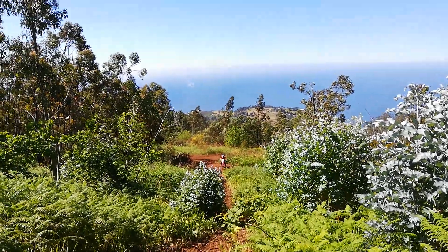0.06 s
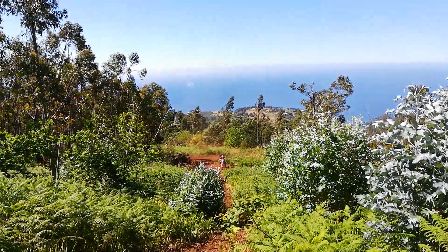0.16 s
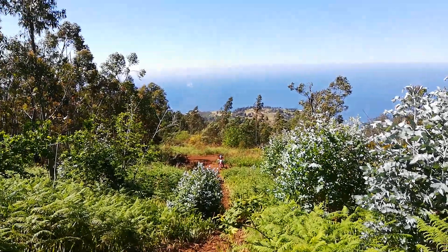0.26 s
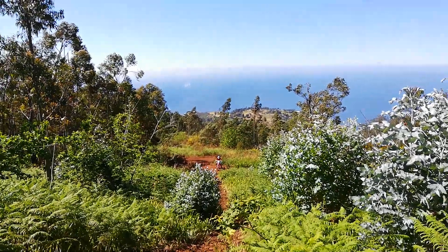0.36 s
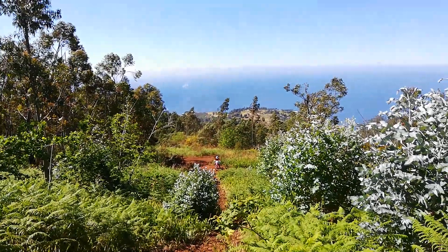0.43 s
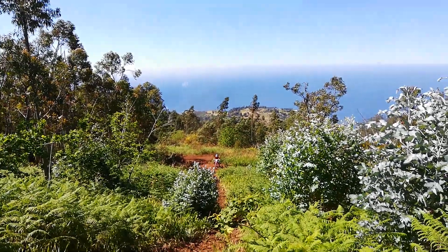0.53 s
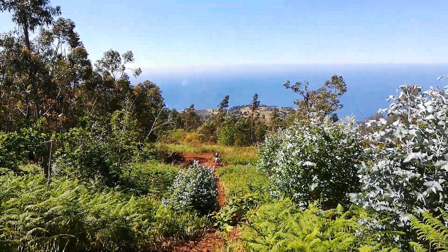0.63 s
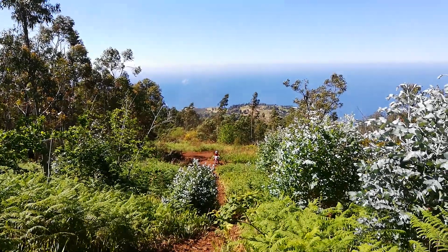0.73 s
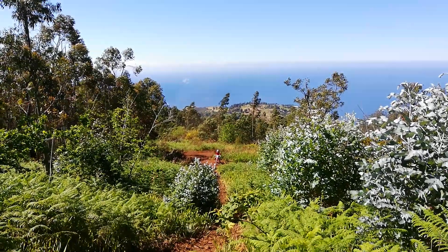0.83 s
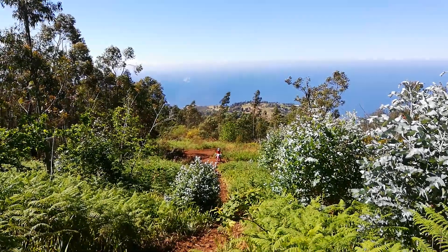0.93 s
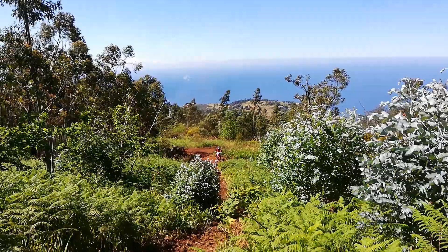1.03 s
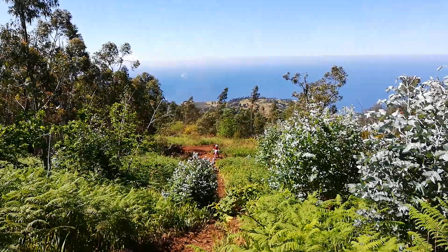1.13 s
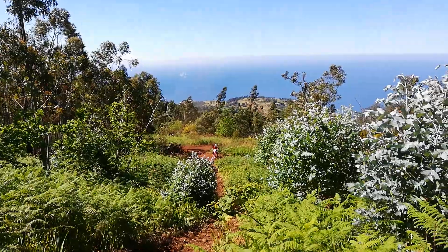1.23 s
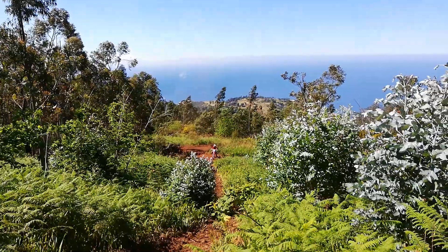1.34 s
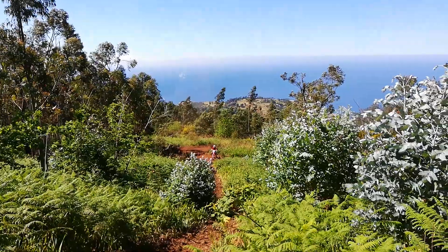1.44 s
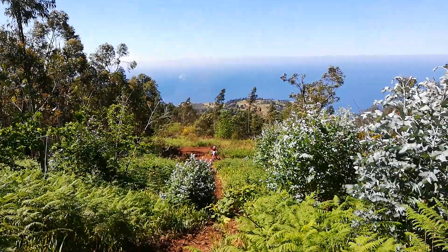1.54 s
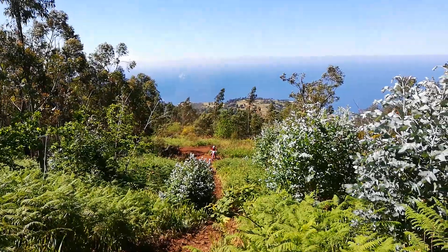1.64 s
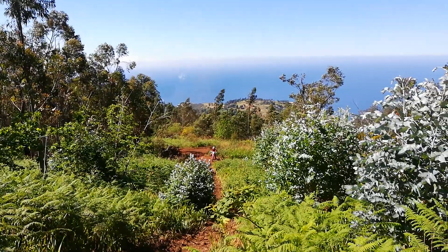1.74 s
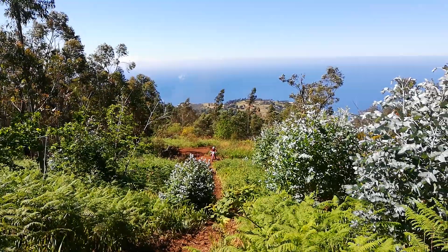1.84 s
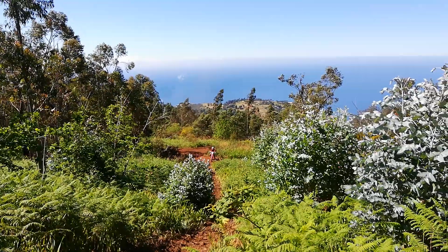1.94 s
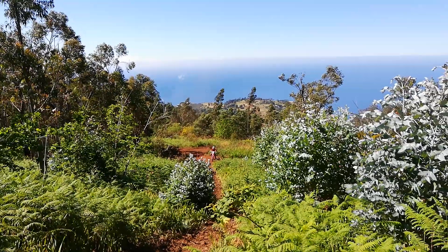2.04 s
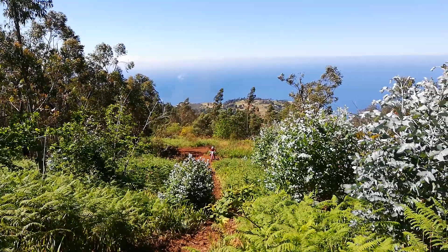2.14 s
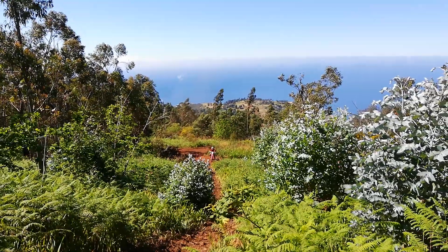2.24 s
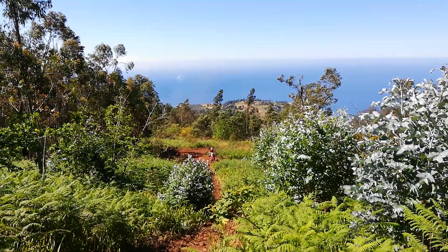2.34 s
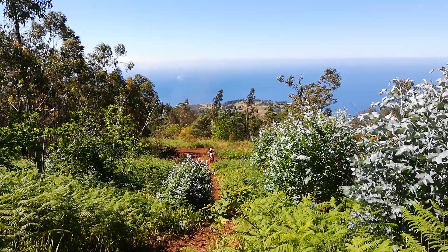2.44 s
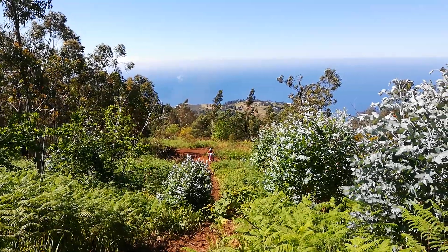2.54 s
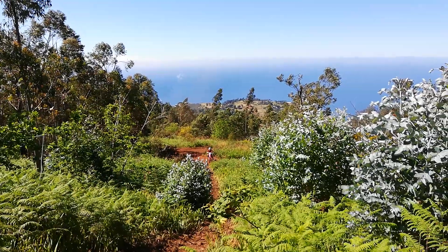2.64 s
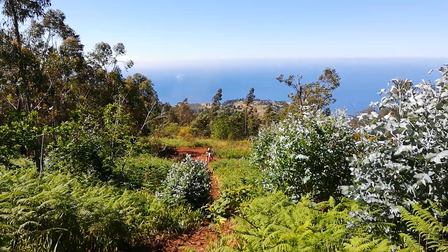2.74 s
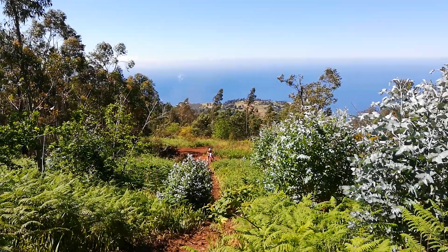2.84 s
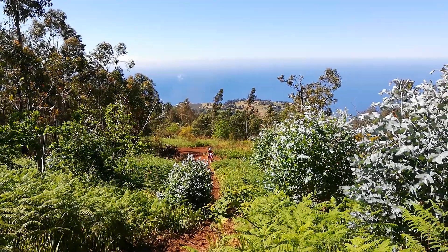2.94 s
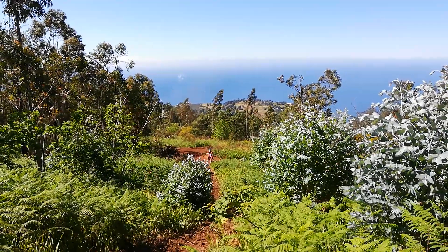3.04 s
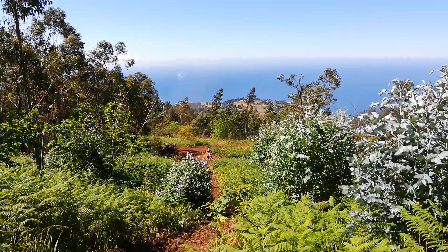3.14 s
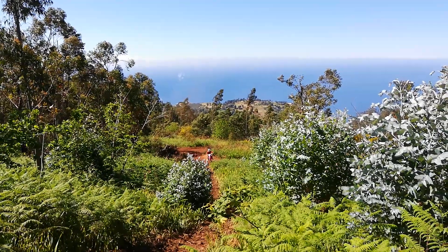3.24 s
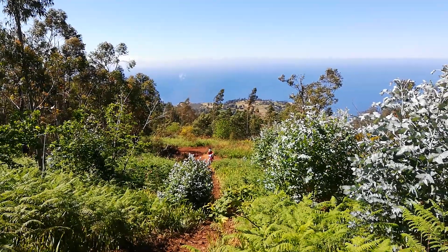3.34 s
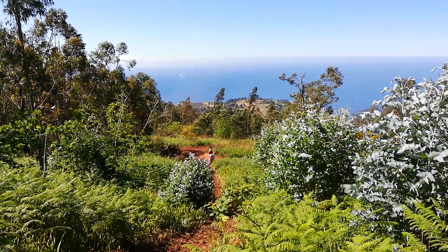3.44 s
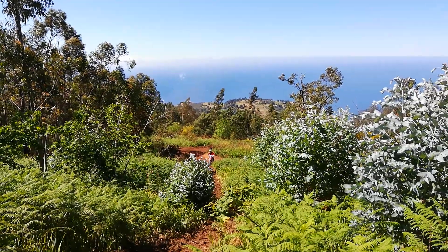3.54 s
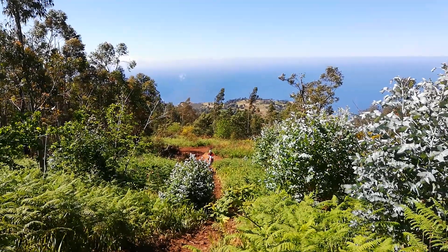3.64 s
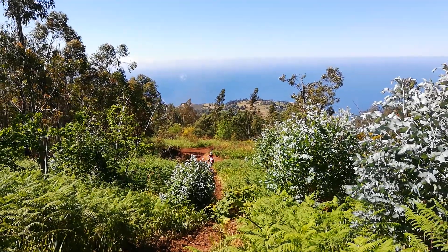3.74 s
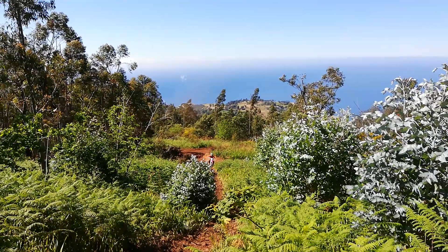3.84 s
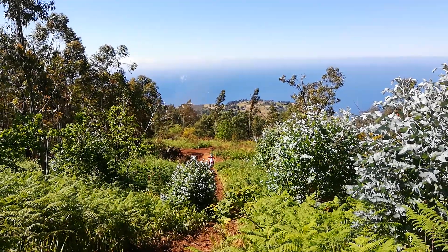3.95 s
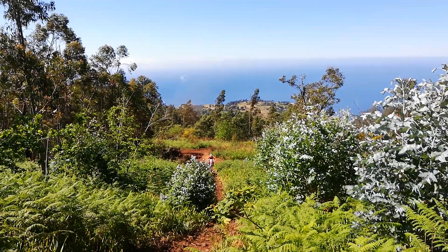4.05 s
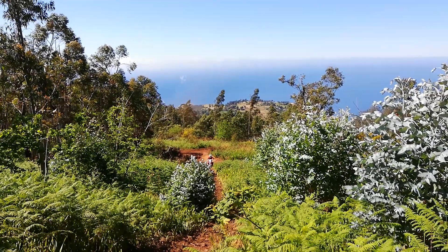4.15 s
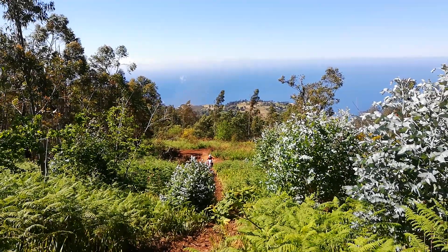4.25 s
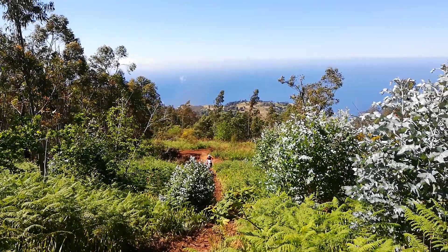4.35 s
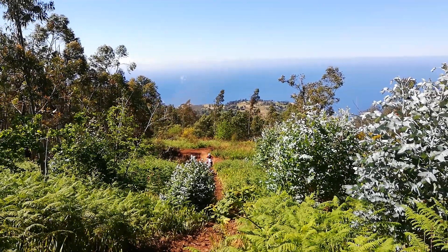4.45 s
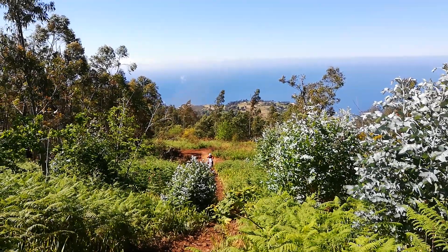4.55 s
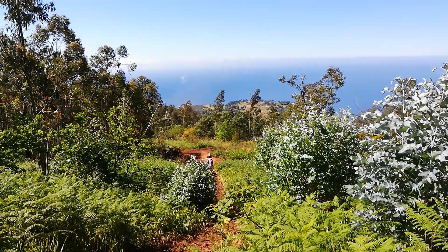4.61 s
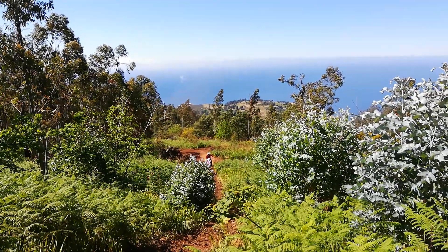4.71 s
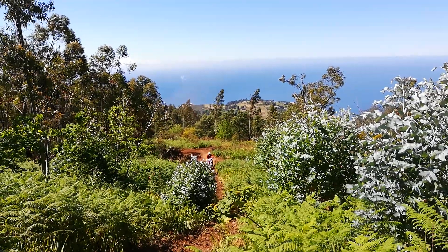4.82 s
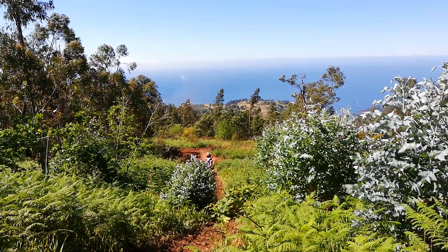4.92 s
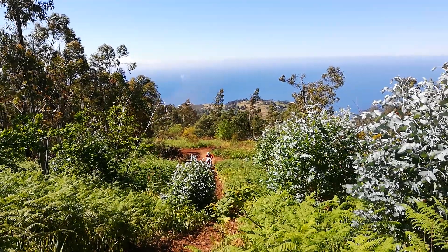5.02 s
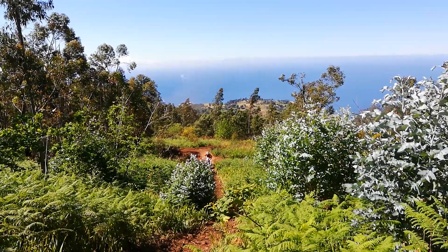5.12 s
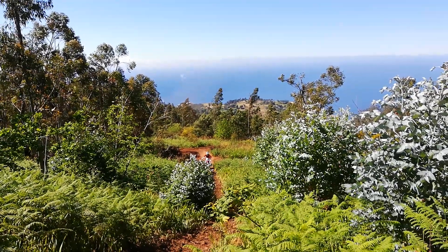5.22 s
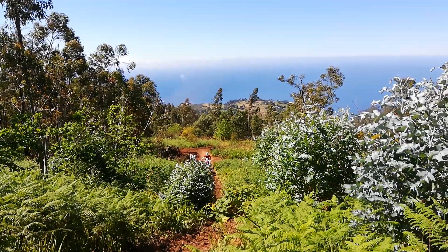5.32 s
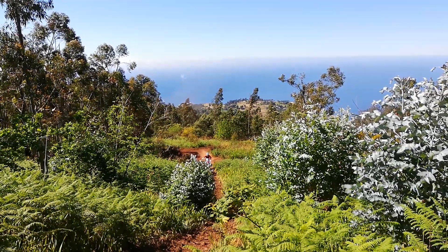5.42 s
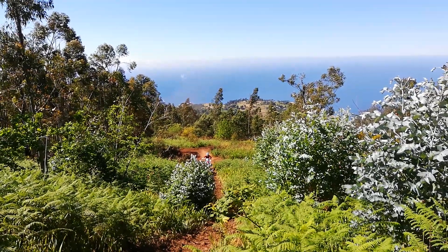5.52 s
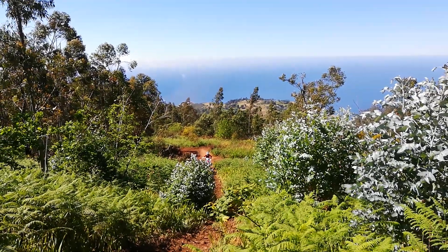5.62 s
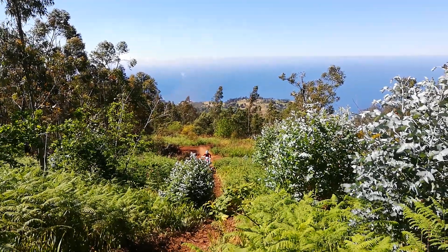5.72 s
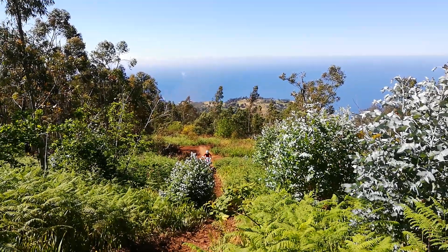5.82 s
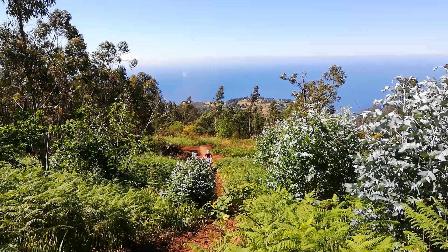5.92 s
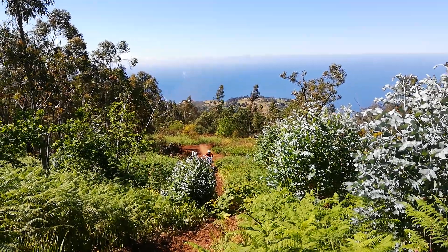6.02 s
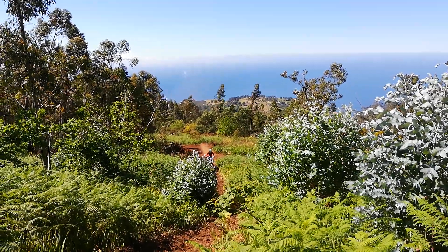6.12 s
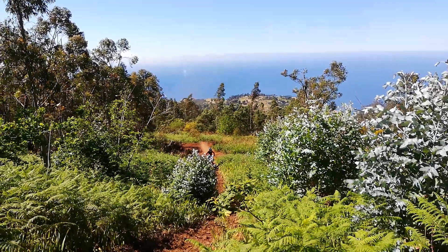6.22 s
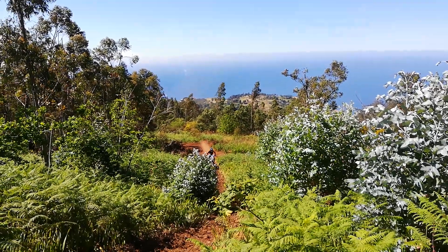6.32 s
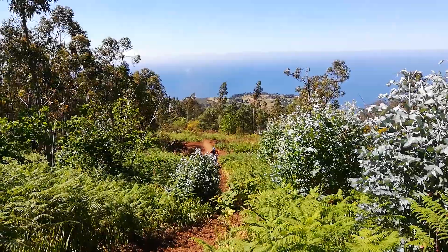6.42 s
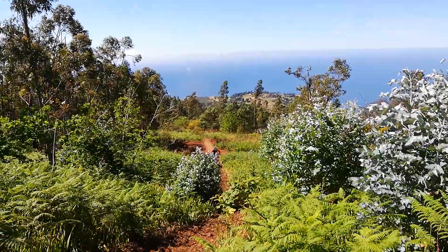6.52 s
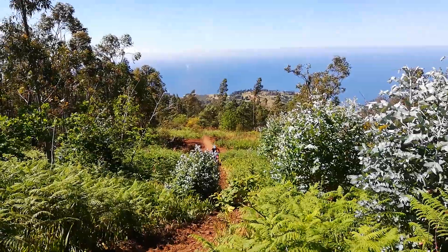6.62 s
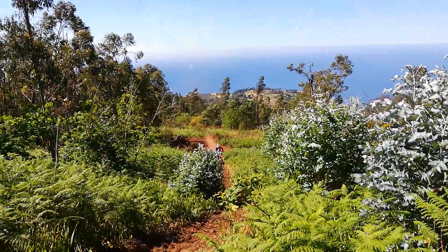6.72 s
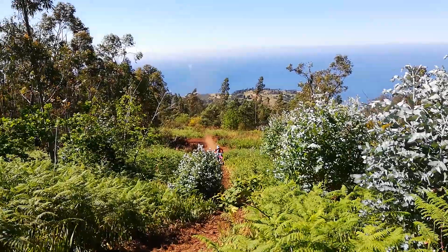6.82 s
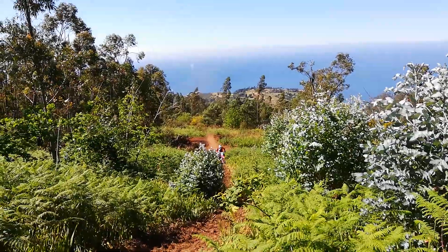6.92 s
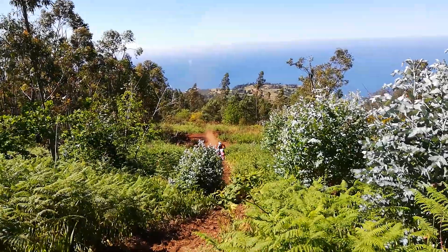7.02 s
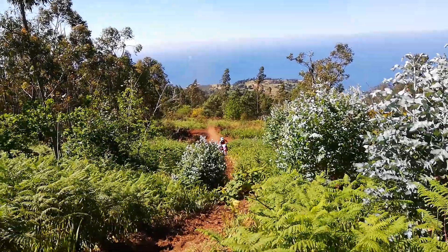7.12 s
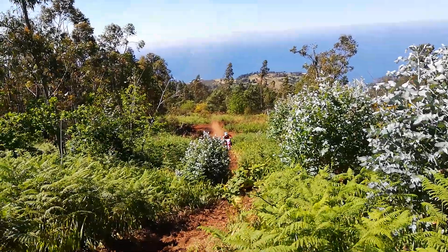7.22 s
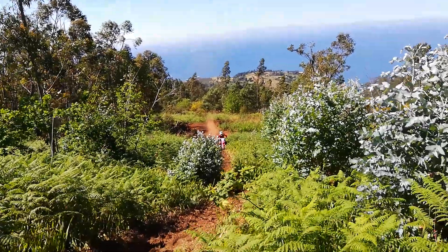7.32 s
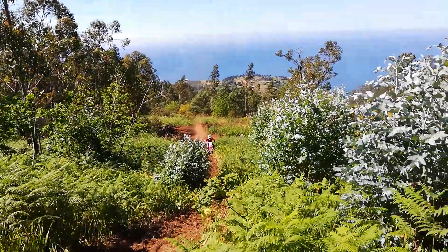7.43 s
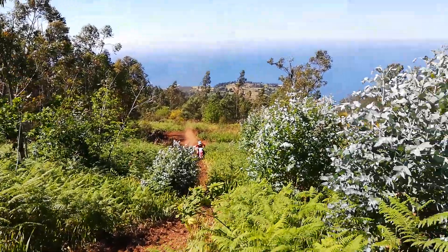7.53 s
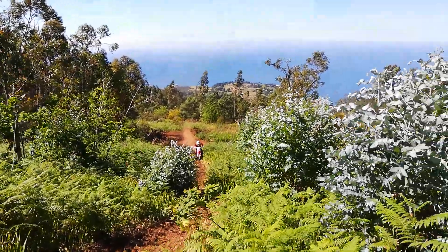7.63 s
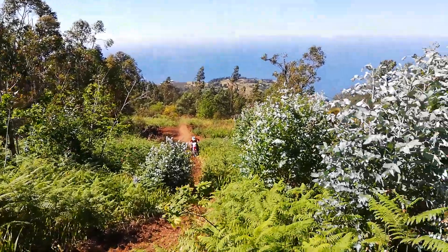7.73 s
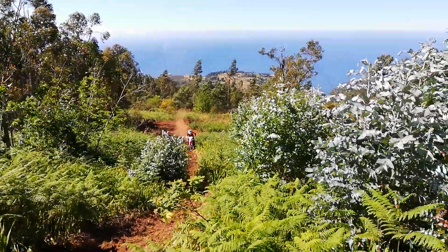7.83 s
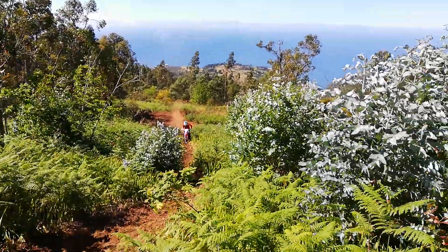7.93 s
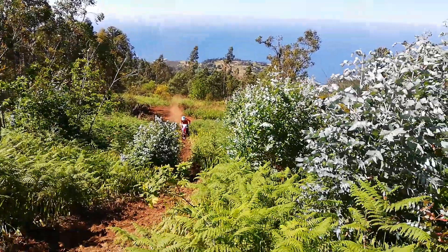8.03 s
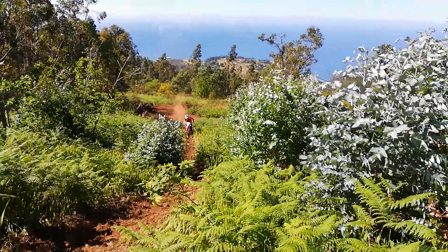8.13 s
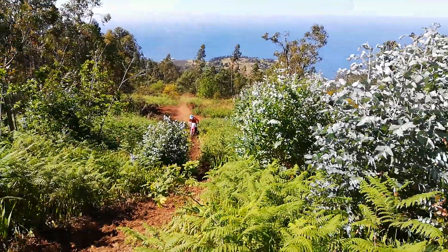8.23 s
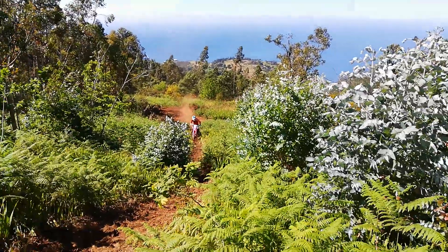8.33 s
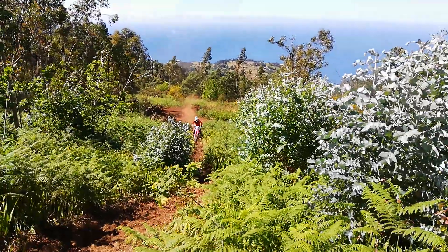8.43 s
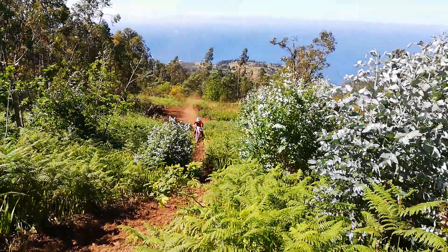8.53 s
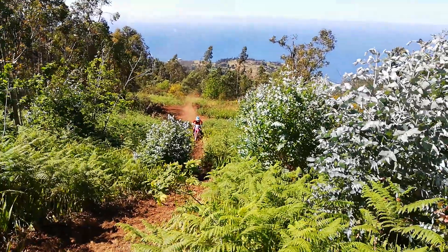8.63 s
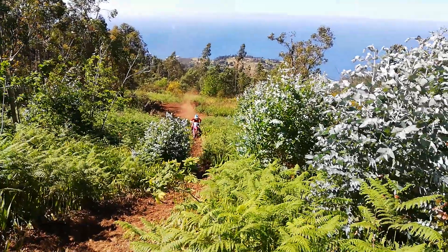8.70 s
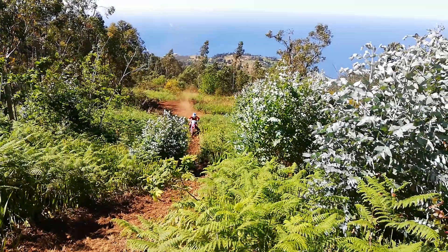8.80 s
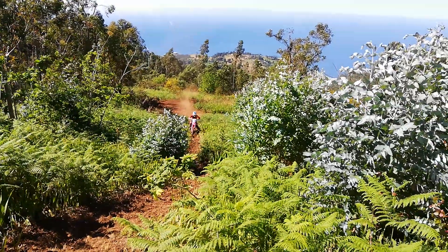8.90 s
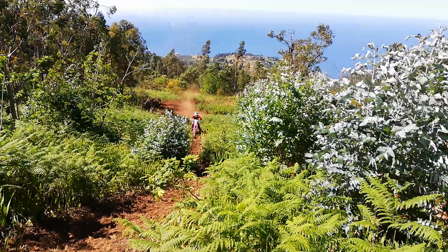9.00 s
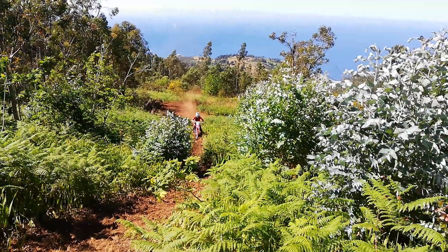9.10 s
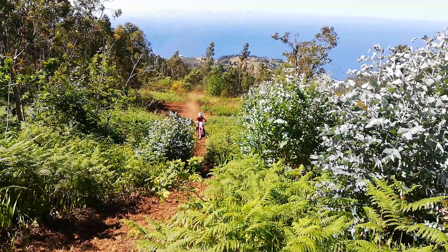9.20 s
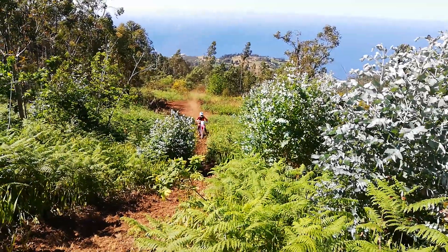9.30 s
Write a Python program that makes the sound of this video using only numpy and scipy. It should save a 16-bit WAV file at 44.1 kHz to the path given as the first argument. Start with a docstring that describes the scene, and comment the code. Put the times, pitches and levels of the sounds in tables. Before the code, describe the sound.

Outdoors on a quiet hillside, a single-cylinder four-stroke dirt bike putters faintly at first, then revs up and down in short throttle blips as it climbs closer. The exhaust turns from soft thumping to a hard, raspy bark. Late on, dry fronds rustle and twigs snap sharply right beside the stereo phone microphone, and the engine ends high and loud.

```python
"""A single-cylinder four-stroke dirt bike climbs a dirt trail toward a phone, the throttle blipped again and again.
Each firing thumps through the silencer as a stack of engine orders (multiples of the firing rate).
With the throttle open, filtered puffs of noise make the gas bark and hiss, with a crack and a rattle in each cycle.
Close by, dry undergrowth rustles and snaps as noise grains and tiny bursts.
Behind it lie a faint hillside hiss, a thin whine, both of filtered noise, a gliding bird note and two dull knocks."""
import sys
import numpy as np
from scipy import signal
from scipy.fft import rfft, irfft
from scipy.io import wavfile
from scipy.ndimage import uniform_filter1d

SR = 44100
rng = np.random.default_rng(int(sys.argv[2]) if len(sys.argv) > 2 else 0)


def dump(signal):
    """Clip the signal to [-1, 1] and save it as 16-bit WAV at the path in sys.argv[1]."""
    limited = np.clip(np.atleast_2d(signal).T, -1, 1)
    pcm = np.round(limited * 32767).astype(np.int16)
    wavfile.write(sys.argv[1], SR, pcm)


N = 412776

# tone of the barking exhaust gas: (frequency [Hz], relative level [dB])
BARK_TONE = [(260, -30), (440, -9.5), (581, -4), (712, -6.5), (947, -1), (1160, 0.5), (1390, -0.5),
             (1530, -6), (1690, -13.5), (2000, -7.5), (2600, -47.5), (4400, -120)]


def undb(db):
    """Turns decibels into a plain gain."""
    return 10 ** (np.asarray(db) / 20)


def unit(x):
    """Scales a sound to an overall RMS of 1."""
    return x / np.sqrt(np.mean(x ** 2))


def along(table, hz):
    """Reads (frequency [Hz], value) rows on a log-frequency axis."""
    f, v = np.transpose(table)
    return np.interp(np.log(hz + 1), np.log(f + 1), v)


def curves(table):
    """Draws straight lines through timed rows, one curve for each column after the time."""
    s, *columns = np.transpose(table)
    return [np.interp(np.arange(N) / SR, s, c) for c in columns]


def colour(x, spectrum):
    """Filters with the gain of (frequency [Hz], level [dB]) rows, never answering before the input."""
    log_gain = np.log(undb(along(spectrum, np.linspace(0, SR / 2, 2049))))
    # folding the cepstrum gives the minimum-phase filter of this gain
    cepstrum = irfft(log_gain)
    cepstrum[1:2048] *= 2
    cepstrum[2049:] = 0
    response = irfft(np.exp(rfft(cepstrum)))
    return signal.oaconvolve(np.atleast_2d(x), response[None], axes=1)[:, :N]


def walk(rate):
    """Wanders smoothly: random levels held for 1 / rate seconds, then averaged twice; spread about 0.4."""
    hold = int(SR / rate)
    steps = np.repeat(rng.standard_normal(N // hold + 1), hold)
    return 0.56 * uniform_filter1d(uniform_filter1d(steps, hold), hold)[:N]


def ports(mid, side):
    """Feeds two microphone ports by mixing a shared and an unrelated part, frequency by frequency."""
    # how alike left and right are: (frequency [Hz], correlation [-1 to 1])
    likeness = [(60, 0.9), (130, 0.9), (290, 0.85), (640, 0.8), (1410, 0.85), (3100, 0.6), (6820, 0.3),
                (15000, 0.2)]
    # balance: (frequency [Hz], left minus right [dB])
    left_db = [(60, 0.0), (110, 0.0), (200, 0.0), (380, -3.5), (700, -3.5), (1290, -3.0), (2380, -1.5),
               (4400, -2.0), (8120, 0.5), (15000, 0.0)]
    # phase by which left leads right: (frequency [Hz], lead [rad])
    lead = [(300, 0.66), (1200, 0.29), (2200, 0.057), (4900, 0.81), (6600, 1), (9200, 0.99), (14000, 0.41)]
    hz = np.linspace(0, SR / 2, N // 2 + 1)
    alike = np.clip(along(likeness, hz), 0, 1)
    # half of the balance and lead goes to each port, in opposite directions
    lean = undb(along(left_db, hz) / 2) * np.exp(.5j * along(lead, hz))
    shared = rfft(mid) * np.sqrt((1 + alike) / 2)
    unrelated = rfft(side) * np.sqrt((1 - alike) / 2)
    return irfft(np.array([(shared + unrelated) * lean, (shared - unrelated) / lean]), N)


def hill():
    """Leaves and air far off hiss faintly: filtered noise, partly alike at the two ports."""
    # tone of the hiss: (frequency [Hz], relative level [dB])
    air_tone = [(120, 12), (200, 1.5), (300, 0.5), (403, -7), (727, -10.5), (923, 3), (1310, -18),
                (1580, -10), (1790, -5.5), (2740, -16.5), (6160, -21.5), (9590, -17), (15200, -38.5),
                (16400, -32)]
    # part that is alike at both ports: (frequency [Hz], share of the power [0-1])
    shared_part = [(300, 0.72), (1200, 0.097), (4000, 0.15)]
    level_db = -48  # typical level; it wanders slowly around this
    both, left, right = (rfft(x) for x in colour(rng.standard_normal((3, N)), air_tone))
    share = np.clip(along(shared_part, np.linspace(0, SR / 2, len(both))), 0, 1)
    air = irfft(np.sqrt(share) * both + np.sqrt(1 - share) * np.array([left, right]), N)
    return unit(air) * undb(level_db + 1.2 * walk(3))


def whine():
    """A narrow band of noise near five kilohertz sings thinly and flickers."""
    # strength before the flicker: (time [s], level [dB])
    strength = [(0, -90), (1.7, -80), (2.2, -66.5), (3.0, -74), (3.5, -77), (4.1, -65), (4.7, -69),
                (5.0, -75), (6.5, -72), (9.36, -74)]
    centre_hz, width_hz = 4970, 120
    level_db, = curves(strength)
    b, a = signal.iirpeak(centre_hz, centre_hz / width_hz, SR)
    band = unit(signal.lfilter(b, a, rng.standard_normal((2, N))))
    return ports(*band) * undb(level_db + 7.0 * walk(14))


def bird_note():
    """A far bird gives one short falling note: a gliding sine that swells and fades."""
    start_s, length_s, glide_hz, peak_db = .912, 0.019, (3600, 2820), -55
    progress = np.clip((np.arange(N) / SR - start_s) / length_s, 0, 1)
    phase = 2 * np.pi * np.cumsum(np.interp(progress, [0, 1], glide_hz)) / SR
    return undb(peak_db) * np.sin(np.pi * progress) * np.sin(phase)


def knocks():
    """Each dull knock is a fading burst of noise through a broad resonance."""
    # the knocks: (time [s], centre frequency [Hz], peak level [dB])
    strikes = [(0.141, 650, -40), (8.75, 350, -23)]
    t60_s = .05  # time for the burst to fade by 60 dB
    t = np.arange(N) / SR
    out = np.zeros(N)
    for s, hz, db in strikes:
        fade = (t > s) * undb(-60 * np.abs(t - s) / t60_s)
        knock = signal.lfilter(*signal.iirpeak(hz, 1.2, SR), fade * rng.standard_normal(N))
        out = out + undb(db) * knock / np.abs(knock).max()
    return out


def brush():
    """Dry fronds rub: flickering noise with a spray of tiny cracks of differing strength at the two ports."""
    # strength of the rustle: (time [s], level [dB])
    strength = [(6.55, -75), (6.71, -64), (6.91, -41), (7.09, -44.5), (7.32, -29.5), (7.56, -40),
                (7.64, -30.5), (8.1, -38), (8.32, -44.5), (8.56, -42), (8.79, -38.5), (8.87, -52),
                (9.1, -74)]
    # tone of the rustle: (frequency [Hz], relative level [dB])
    frond_tone = [(1060, -50), (1800, -32), (2350, -54), (2940, -13.5), (6090, -8.5), (8420, -2),
                  (9580, 3.5), (12900, -10.5), (15100, -10), (15900, -40), (16400, -66)]
    cracks_per_s, crack_decay_s = 550, 0.00046
    rustle_db, = curves(strength)
    s = np.arange(N) / SR
    moving = np.clip(np.minimum(s - strength[0][0], strength[-1][0] - s) / .1, 0, 1)
    hit = rng.random(N) < cracks_per_s / SR
    # both ports crack at the same moments, but each with some strength of its own
    size_db = 3.7 * rng.exponential(size=N).clip(0, 2.8) + 3.1 * rng.standard_normal((2, N))
    cracks = signal.lfilter([1], [1, -np.exp(-1 / (crack_decay_s * SR))], hit * undb(size_db))
    grain = (undb(0.7 * walk(40)) + cracks) * rng.standard_normal((2, N))
    return unit(colour(grain, frond_tone)) * undb(rustle_db) * moving


def snaps():
    """A twig breaks with a noise burst well under a millisecond long, then a short rattle, in two bands."""
    # twigs: (time [s], main band peak [dB], main band centre [Hz],
    # second band against the main one [dB], left minus right [dB])
    twigs = [(2.0786, -16.5, 8460, -37, -5), (2.195, -36, 9270, -11, -4), (6.9208, -16, 8600, -34, -9),
             (7.2296, -25, 9500, -24, -2), (7.288, -22, 9630, -23, -5), (7.43, -27, 10260, -20, 1.5),
             (7.457, -8.5, 10100, -27, -4), (7.498, -30, 8830, -20, -1), (7.6153, -17, 9820, -25, 1.0),
             (7.6294, -4.5, 9500, -30, -3), (7.7135, -8.5, 9500, -15, 2), (7.7506, -26, 8850, 4.5, -6),
             (7.781, -11, 7850, -10, 1), (7.8085, -11, 9200, -16, -1), (7.8192, -6.5, 8700, -7.5, -7),
             (7.8485, -11, 8500, -27, 3), (7.875, -11, 9400, -4.5, -5), (7.902, -18, 8560, -26, 2),
             (7.9423, -14, 8400, -25, 0.5), (8.0089, -15, 9600, -20, 0.5), (8.0975, -9, 7850, -28, -2),
             (8.139, -12, 9000, -7, -3), (8.1556, -14, 8660, -3.5, 4), (8.1978, -16.5, 8160, -26, -3),
             (8.274, -13, 7000, -26, 5), (8.3211, -23, 10600, -20, 1.5), (8.34, -6, 12400, -42, -3),
             (8.39, -10, 9200, -42, 0), (8.448, -14, 9000, -32, 1), (8.471, -19, 8700, -6, -3),
             (8.4947, -7, 9100, -34, -5), (8.516, -20, 8640, -5, -1.0), (8.538, -7, 9500, -35, -4),
             (8.5829, -31, 8870, -8, 0.0), (8.6278, -30, 10300, 7, -1.0), (8.6644, -9.5, 10300, -4, 4),
             (8.7058, -14, 8500, -15, -6), (8.7549, -8.5, 8750, -6.5, 0), (8.798, -8, 9450, -29, -3),
             (8.9695, -26, 9700, 5, -5)]
    length = 900  # samples
    out, t = np.zeros((2, N + length)), np.arange(length) / SR
    noise = rng.standard_normal((len(twigs), 3, length))
    envelope = t / 0.00012 * np.exp(-t / 0.000083) + 0.048 * np.exp(-t / 0.0036)
    for (s, db, hz, second_db, pan_db), (both, left, right) in zip(twigs, noise):
        burst = (both + .9 * np.array([left, right])) * envelope
        snap = 0
        for centre_hz, q, part_db in [(hz, 2.1, 0), (4000., 1.1, second_db)]:
            b, a = signal.iirpeak(centre_hz, q, SR)
            part = signal.lfilter(b, a, signal.lfilter(b, a, burst))
            snap = snap + undb(part_db) * part / np.abs(part).max()
        at = int(s * SR)
        out[:, at:at + length] += snap * undb(db + np.array([[pan_db], [-pan_db]]) / 2)
    return out[:, :N]


def crank(hz):
    """Counts cycles from the firing rate, gaining or losing a little so that a firing falls on every chug."""
    # firings that stand out singly: (time [s])
    chugs = [.219, 3.878, 5.07, 5.171, 5.203, 5.394, 5.449, 5.766, 5.92, 5.971, 6.012, 6.109, 6.138, 6.189,
             7.912, 7.968, 8.036, 8.087, 8.616, 9.004, 9.084, 9.159, 9.266]
    cycle, gained = np.cumsum(hz) / SR, [0]
    at = (np.array(chugs) * SR).astype(int)
    for c in cycle[at]:
        gained.append(np.round(c + gained[-1]) - c)
    return 1 + cycle + np.interp(np.arange(N), at, gained[1:])


def throttle_shut():
    """Tells how far the throttle is shut, 0-1, while the engine idles or brakes."""
    # closed spells: (start [s], length [s], share shut [0-1])
    lifts = [(-.1, 1.98, 0.89), (3.6, 0.087, 0.8), (4.99, 0.19, 0.7), (5.687, 0.34, 0.56),
             (6.393, 0.086, 0.48), (7.376, 0.63, 0.77), (8.203, 0.17, 0.36), (8.933, 0.29, 0.06)]
    edge_s = 0.015  # time to close or open
    t = np.arange(N) / SR
    shut = 0
    for start, length, share in lifts:
        shut = shut + share * np.clip(np.minimum(t - start, start + length - t) / edge_s, 0, 1)
    return np.clip(shut, 0, 1)


def orders(hz, cycle, chance, thump_db, shut, growl_db):
    """Sums cosines at multiples of the firing rate: the thump of the pipe and the growl of the engine cases."""
    # balance of the orders at the tailpipe: (frequency [Hz], relative level [dB])
    silencer = [(18, -12), (30, 2), (40, 2.5), (55, 3), (80, 2), (115, 2.5), (150, 6), (175, -2),
                (210, -10), (250, -28), (280, -50)]
    # orders off the engine cases: (frequency [Hz], level against the growl curve [dB])
    cases = [(200, -47), (250, -17), (290, -15.5), (340, -13.5), (390, -12), (450, -55), (600, -49)]
    # extra for the lowest orders, counted from one, throttle open and shut: (relative level [dB])
    open_db = [0.5, 3, -10.5, 1, 2.5]
    shut_db = [-30, -4, 5, 3.5, 1.5]
    # delay filters that hold the pulse back in the pipe chamber: (frequency [Hz], width [Hz])
    pipe_delays = [(150, 92)]
    knee_hz, shut_db_per_oct = 142, -30  # fully shut, orders above the knee fall away
    lug_hz, lug_db_per_hz = 22.6, [2.5, 2, 2.5]  # below this firing rate orders one to three thin out

    turn = np.arange(len(chance))
    uneven = np.clip((42 - hz) / 16, .2, 1.1)  # slow firings burn less alike
    step = np.arange(0, N, 64)  # levels change slowly, so a coarse grid is enough
    stack_hz, shut = np.outer(np.arange(1, 21), hz[step]), shut[step]
    tail_db = along(silencer, stack_hz)
    tail_db[:len(open_db)] += np.outer(open_db, 1 - shut) + np.outer(shut_db, shut)
    tail_db += shut_db_per_oct * shut * np.log2(stack_hz / knee_hz).clip(0)
    tail_db[:len(lug_db_per_hz)] -= np.outer(lug_db_per_hz, (lug_hz - hz[step]).clip(0))
    tail = undb(tail_db)
    tail *= undb(thump_db[step]) / np.sqrt(np.sum(tail ** 2, axis=0))  # the orders share the thump
    gains = tail + undb(growl_db[step] + along(cases, stack_hz))
    pipe = 0
    for k in range(1, 21):
        gain = np.interp(np.arange(N), step, gains[k - 1])
        # level luck: one part common to all orders, one for this order alone
        wobble_db = uneven * np.interp(cycle, turn, 1.4 * chance[:, 0] + 1.8 * chance[:, k])
        loose = uneven * np.clip(k * hz / 70 - 2, 1, 3.5)  # the cases shake less in step than the pipe
        slip = loose * np.interp(cycle, turn, .3 * chance[:, 20 + k])
        slip = slip + uneven * np.interp(cycle, turn, .05 * k * chance[:, 43])  # common timing luck
        pipe = pipe + np.sqrt(2) * gain * undb(wobble_db) * np.cos(2 * np.pi * k * cycle + slip)
    pipe = pipe * np.clip(np.arange(N) / (.004 * SR), 0, 1)  # no click at the start
    for f, w in pipe_delays:
        a = signal.iirpeak(f, f / w, SR)[1]
        pipe = signal.lfilter(a[::-1], a, pipe)  # all-pass: delays without changing levels
    return pipe


def clatter(hz, cycle, chance, puff, crack_gain):
    """The exhaust valve cracks, and a rattle tied to the crank angle repeats each cycle, slowly changing."""
    # tone of the valve crack: (frequency [Hz], relative level [dB])
    crack_tone = [(200, -31.5), (300, -2.5), (400, -3), (520, -4.5), (700, 6), (900, 0.5), (1150, 13.5),
                  (1450, 1.5), (1700, -7), (2100, -6.5), (2700, -16), (4400, -40.5)]
    crack_db = -1  # crack against the rattle, before the throttle and port gains
    at = np.flatnonzero(np.diff(np.floor(cycle)))
    clicks = np.zeros(N)
    clicks[at] = undb(1.2 * chance[:len(at), 41]) / np.sqrt(hz[at])
    # three fixed patterns take turns being the strongest
    share = undb(5.0 * np.array([walk(1.8) for _ in range(3)]))
    share /= np.sqrt(np.sum(share ** 2, axis=0))
    patterns = rng.standard_normal((3, 2, 300))
    angle = (cycle % 1 * 300).astype(int)
    rattle = puff * sum(w * p[:, angle] for w, p in zip(share, patterns))
    crack = np.array([[1], [.15]]) * unit(colour(clicks, crack_tone))  # mostly shared by both ports
    return unit(colour(rattle, BARK_TONE)) + undb(crack_db) * crack_gain * crack


def banks(x):
    """Earth banks and bushes along the trail scatter each puff into a short fading tail of noise."""
    tail_db, t60_s = -6, 0.13  # tail gain; time to fade by 60 dB
    t = np.arange(SR // 5) / SR
    tail = rng.standard_normal((2, len(t))) * undb(-60 * t / t60_s) * (t > .003)
    tail = tail / np.sqrt(np.sum(tail[0] ** 2))
    return x + undb(tail_db) * signal.oaconvolve(x, tail, axes=1)[:, :N]


def bike():
    """Fires once every two crank turns: the orders, then the bark and hiss of each puff of gas."""
    # engine speed: (time [s], firing rate [Hz])
    speed = [(0, 28), (.13, 27.3), (.78, 24.1), (1.41, 23.9), (1.54, 20.7), (1.69, 16), (1.8, 16.8),
             (2.01, 25.2), (2.37, 31.9), (2.5, 32), (2.61, 35.8), (2.71, 35), (2.87, 41), (3.28, 27.2),
             (3.44, 33.9), (3.65, 23.5), (3.75, 29.7), (3.83, 39), (3.91, 44.3), (3.99, 36.5), (4.07, 27.8),
             (4.25, 26.5), (4.48, 30.4), (4.87, 27.5), (5.05, 20.2), (5.11, 18.1), (5.21, 34.5),
             (5.28, 38.4), (5.37, 35), (5.58, 48.7), (5.68, 53.4), (5.74, 49.1), (5.81, 29.8), (5.91, 19.2),
             (6.07, 32), (6.33, 50.8), (6.41, 48.9), (6.57, 35.7), (6.65, 34.6), (6.72, 37.1), (6.86, 49.1),
             (6.96, 53.3), (7.06, 40), (7.12, 33.9), (7.19, 32.4), (7.27, 42.6), (7.38, 51.6), (7.66, 28.9),
             (7.9, 18.1), (7.95, 19.2), (8.0, 30.3), (8.16, 52.3), (8.24, 46.5), (8.39, 34.3), (8.47, 39.6),
             (8.65, 56.1), (8.75, 62.8), (8.86, 55.4), (9.03, 48.6), (9.12, 53.5), (9.27, 63.2),
             (9.36, 61.4)]
    # effort: (time [s], thump of the firings [dB], throttle as the level of the bark [dB])
    effort = [(0, -32.5, -59), (.1, -40.5, -59), (.8, -41, -60), (1.5, -43.5, -59), (1.67, -41.5, -64),
              (2.03, -36.5, -54), (2.24, -35, -55.5), (2.4, -35, -60.5), (2.5, -36.5, -55.5),
              (2.7, -41, -56.5), (2.87, -39, -52), (3.05, -40, -54), (3.25, -37, -53), (3.3, -36, -48.5),
              (3.42, -39.5, -53.5), (3.62, -40.5, -61.5), (3.72, -38, -54.5), (3.76, -37, -42.5),
              (3.86, -32.5, -42.5), (3.94, -39, -45.5), (4.03, -40.5, -56.5), (4.2, -41, -62.5),
              (4.64, -40.5, -59.5), (4.73, -39.5, -54.5), (5.0, -42, -62.5), (5.11, -43, -56),
              (5.14, -29, -41), (5.19, -32, -39), (5.3, -34.5, -47), (5.38, -32.5, -45.5),
              (5.55, -30.5, -38.5), (5.69, -32.5, -37), (5.79, -27, -43), (5.89, -39.5, -47.5),
              (6.05, -29, -44), (6.15, -32, -43), (6.27, -31, -38.5), (6.43, -30.5, -38),
              (6.57, -32.5, -45.5), (6.7, -32, -43), (6.94, -31.5, -36.5), (7.09, -30.5, -43),
              (7.24, -30.5, -46.5), (7.33, -31.5, -42.5), (7.44, -26, -41), (7.57, -26, -46),
              (7.7, -39.5, -54), (7.86, -47, -55), (7.95, -36.5, -60), (8.0, -28.5, -45.5),
              (8.11, -30, -39), (8.22, -32.5, -41.5), (8.38, -33.5, -47), (8.48, -32.5, -47.5),
              (8.62, -28.5, -38), (8.76, -25, -34.5), (8.92, -28, -36.5), (9.1, -23.5, -33.5),
              (9.23, -23.5, -32.5), (9.36, -29, -37.5)]
    # colour that reaches the phone as the bike turns and passes behind bushes, all against the
    # throttle curve: (time [s], growl [dB], low bark [dB], hiss [dB])
    turning = [(0, -8, -1.5, 0), (1.5, -12, -9, -2), (2.1, -1, -1.5, -3.5), (2.4, 12.5, 13.5, 8),
               (3.0, -20, 2, 7), (3.5, 5.5, 5, 3), (3.85, -17, -5.5, 5), (4.3, 4, 3.5, 1.5),
               (5.1, -24, -3, -0.5), (5.35, -20, 4, -1.5), (5.7, -24, -4.5, -4.5), (6.1, -12, 3.5, -4),
               (6.35, -11, -4, -5), (6.48, -25, -15, -5.5), (6.7, -3, -0.5, -6), (6.95, -12, -14.5, -1.5),
               (7.25, -3, 5, 2.5), (7.5, 4, -10, 4.5), (7.75, -16, -26, 7), (8.03, 5, 1, 2.5),
               (8.3, 1.5, 0, 5), (8.55, 8.5, 4.5, 3.5), (8.72, -6, -10, 3), (9.0, 6.5, -3, -1.5),
               (9.36, -15, -11, 3.5)]
    # second puff against the first: (firing rate [Hz], size [ratio])
    second_puff = [(30, 0.04), (60, 1)]
    # tone of the hiss: (frequency [Hz], relative level [dB])
    hiss_tone = [(880, -8), (1500, -8), (1620, -10.5), (1900, -7.5), (2120, -12), (2340, -7), (2690, -12.5),
                 (3000, -9.5), (3150, -13), (3350, -12), (3550, -12.5), (3780, -11), (4100, -12.5),
                 (4390, -12), (4700, -14), (6240, -20), (9850, -19.5), (12900, -40.5), (15100, -44),
                 (16000, -64)]
    quiet_db, split_hz = -54, 850  # around this bark level puffs blur and cracks fade; low/high bark split

    # the flywheel rounds every change
    smooth = [uniform_filter1d(c, int(.03 * SR)) for c in curves(speed) + curves(effort)]
    hz, thump_db, bark_db = smooth
    shut = throttle_shut()
    growl_db, body_db, hiss_db = bark_db + np.array(curves(turning))
    cycle = crank(hz)
    # luck of each cycle, by column: 0-20 and 21-40 order levels and phases, 41 crack, 42 puff, 43 timing
    chance = rng.standard_normal((int(cycle[-1]) + 2, 44))

    # gas leaves in a puff after each firing, another half a cycle later; at speed the flow between stays up
    opened = np.clip((bark_db - quiet_db) / 8 + .5, .15, 1)
    flow = np.clip(hz / 90, .22, .6) + .6 * (1 - opened)
    first = np.exp(-(cycle % 1) / .25)
    second = along(second_puff, hz) * np.exp(-((cycle + .5) % 1) / .3)
    puff = uniform_filter1d(flow + first + second, int(.003 * SR))  # the valve takes a moment to open
    puff = puff * undb(chance[cycle.astype(int), 42])

    clean = np.clip((hz - 12) / 30, .45, .93)  # at speed the cycles repeat more exactly
    rush = unit(colour(puff * rng.standard_normal((2, N)), BARK_TONE))
    repeating = unit(clatter(hz, cycle, chance, puff, opened * (1 - .8 * shut)))
    gas = banks(np.sqrt(1 - clean) * rush + np.sqrt(clean) * repeating)
    low = signal.butter(3, split_hz, "low", fs=SR, output="sos")
    high = signal.butter(3, split_hz, "high", fs=SR, output="sos")
    body, bark = unit(signal.sosfilt(low, gas)), unit(signal.sosfilt(high, gas))
    hiss = unit(colour((0.53 + puff) * rng.standard_normal((2, N)), hiss_tone))
    hiss = hiss * undb(hiss_db + 2.2 * walk(30))
    exhaust = body * undb(body_db) + bark * undb(bark_db) + hiss
    return orders(hz, cycle, chance, thump_db, shut, growl_db) + ports(*exhaust)


def scene():
    """Adds the bike to the undergrowth and the quiet surroundings."""
    return bike() + brush() + snaps() + hill() + bird_note() + knocks() + whine()


def record(dry):
    """The phone cuts the deepest bass below 40 Hz and the top above 16.2 kHz."""
    dry = signal.sosfilt(signal.butter(3, 40., "high", fs=SR, output="sos"), dry)
    return signal.sosfilt(signal.ellip(10, .2, 80, 16200, fs=SR, output="sos"), dry)


dry = scene()
out = record(dry)
dump(out)
```